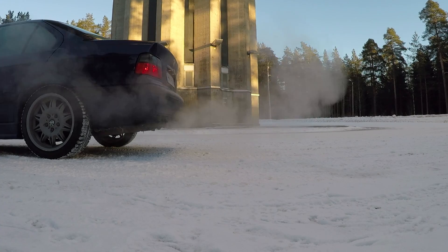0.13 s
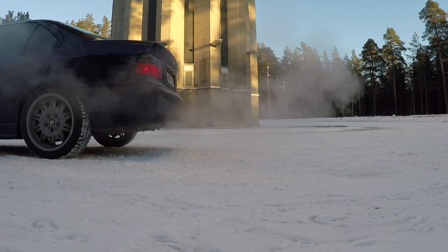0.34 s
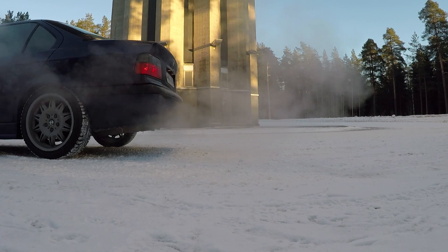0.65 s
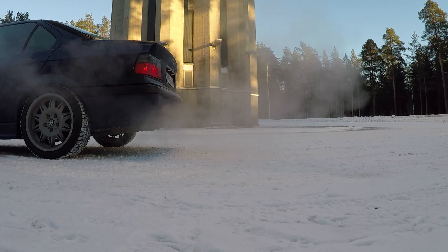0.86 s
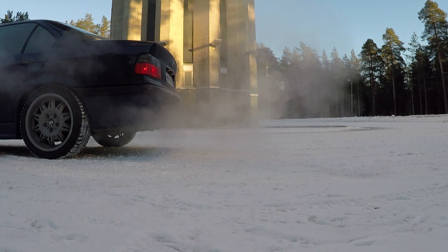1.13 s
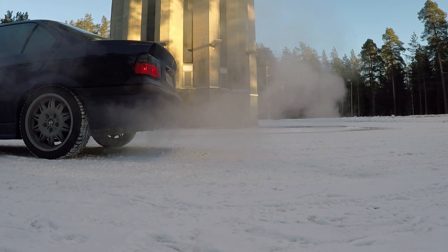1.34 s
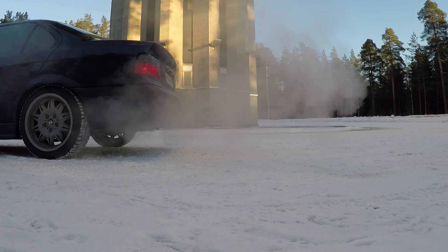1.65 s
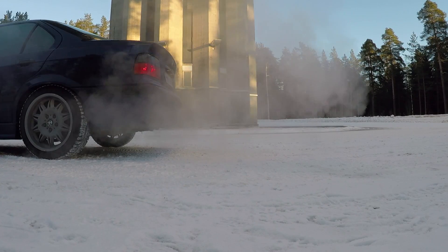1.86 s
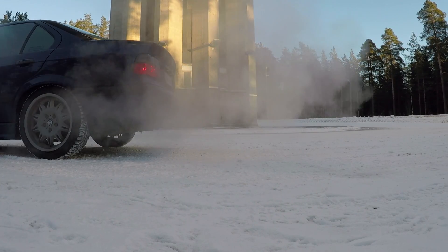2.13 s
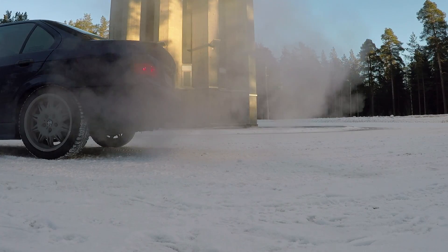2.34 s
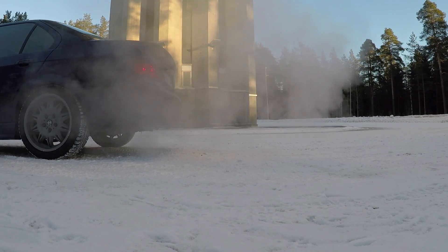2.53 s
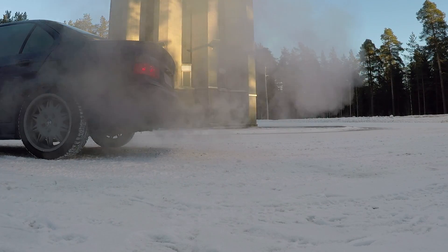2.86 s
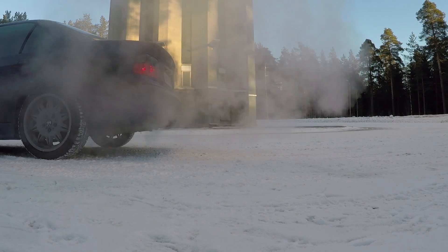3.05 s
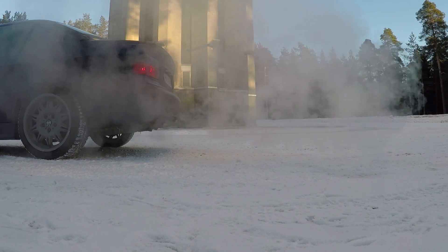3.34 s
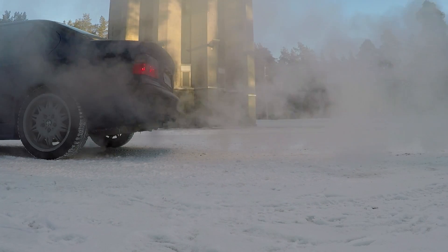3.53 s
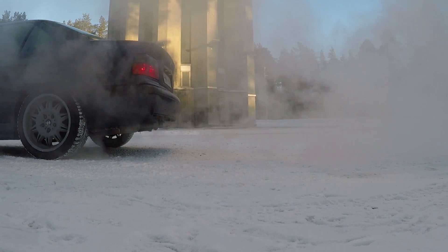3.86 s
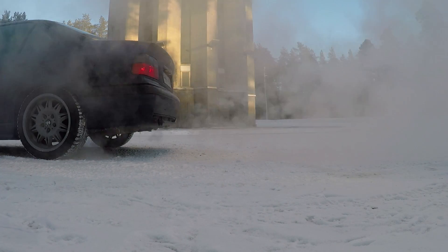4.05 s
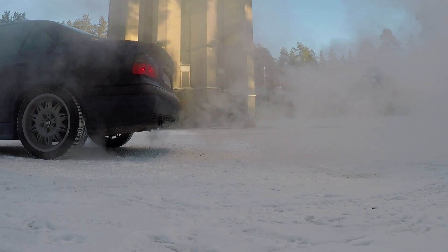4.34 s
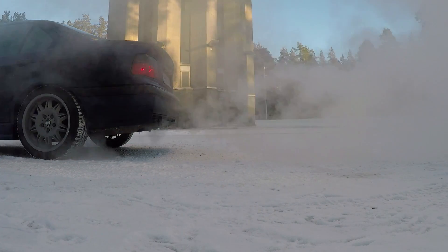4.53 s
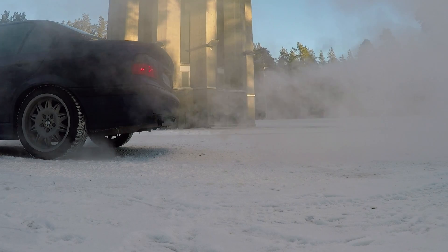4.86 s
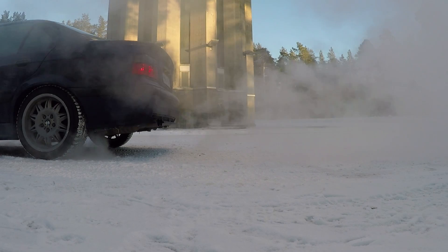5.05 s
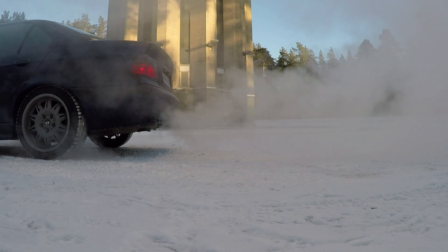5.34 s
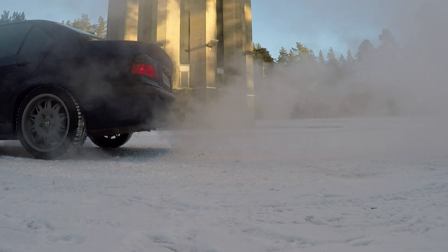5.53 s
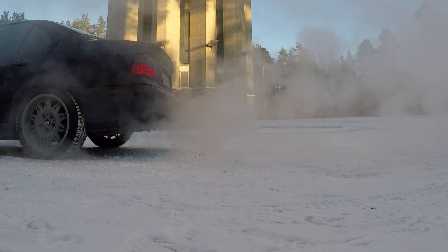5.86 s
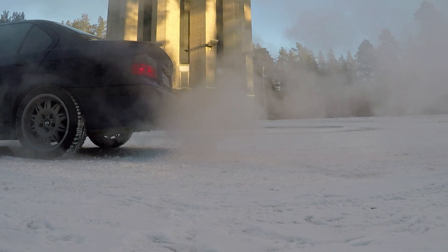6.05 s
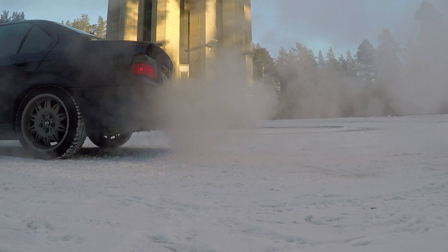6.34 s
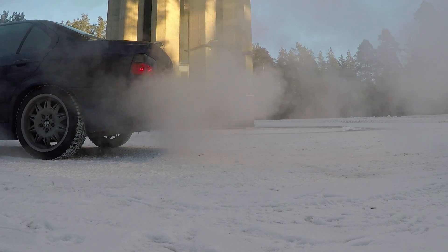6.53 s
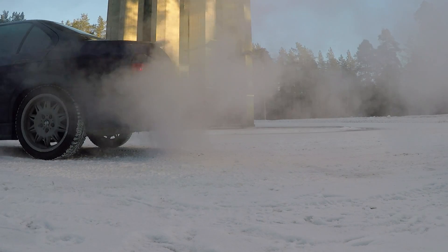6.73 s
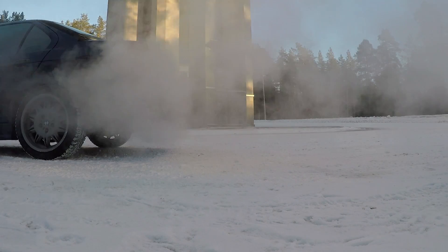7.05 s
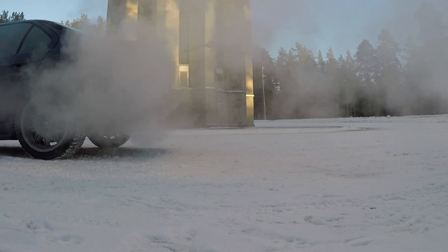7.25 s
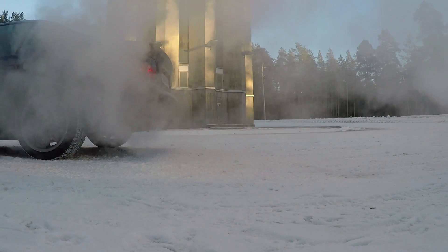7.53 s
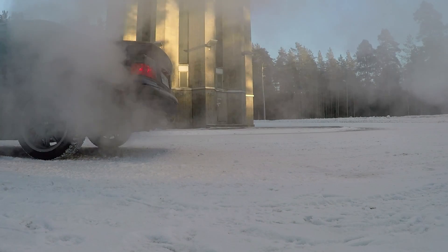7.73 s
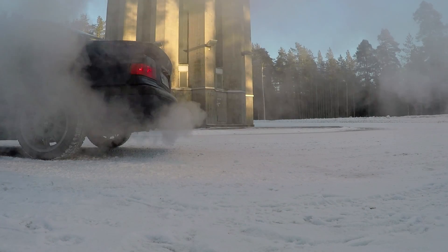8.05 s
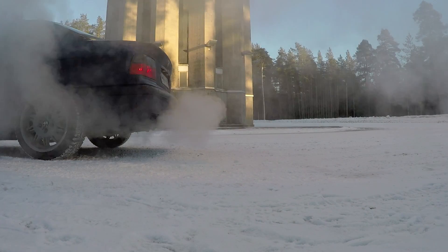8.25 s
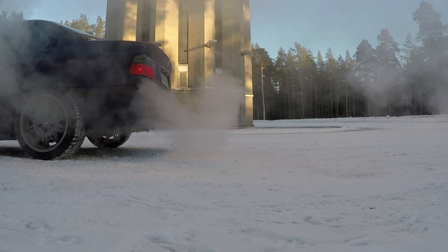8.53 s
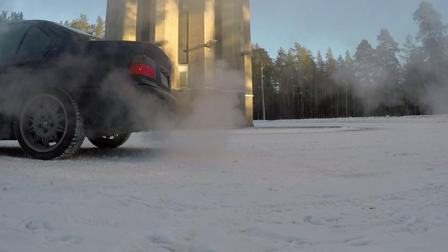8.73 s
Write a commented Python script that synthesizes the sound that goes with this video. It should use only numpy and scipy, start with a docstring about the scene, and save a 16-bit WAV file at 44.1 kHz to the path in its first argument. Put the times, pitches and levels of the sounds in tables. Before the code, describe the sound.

Raspy exhaust of a parked car: two short throttle stabs, a long climb to rapid-fire limiter banging, then a slow fall to uneven idle.

```python
"""A straight-six falls from a few thousand rpm, is blipped twice, then held and rasps up to its limiter.
The limiter cuts and restores the fuel about seven times a second; the revs then drone down to a lumpy idle.
Crank-order sines make the exhaust note; pulse-gated noise makes bark, rasp and pumped rush.
Damped sines make the low booms; filtered noise makes intake hiss, engine-bay whirr and one faint tick."""
import sys
import numpy as np
from scipy import signal
from scipy.fft import rfft, irfft
from scipy.io import wavfile
from scipy.ndimage import uniform_filter1d

SR = 44100
rng = np.random.default_rng(int(sys.argv[2]) if len(sys.argv) > 2 else 0)


def output_pcm(signal):
    """Save a mono or channel-first signal as 16-bit PCM at the path in sys.argv[1].

    Samples are clipped to [-1, 1] before scaling.
    """
    pcm = np.clip(np.atleast_2d(signal).T, -1, 1) * 32767
    wavfile.write(sys.argv[1], SR, np.round(pcm).astype(np.int16))


N = 392049
T = np.arange(N) / SR

# throttle presses, the last into the limiter:
# opens_s, ends_s, close_s, reached_rpm (before limiting), relative gas_db, relative crack_db
PRESSES = [(.96, 1.155, .035, 3343, -2, 10), (1.877, 2.131, 0.15, 3437, -2, 16),
           (2.83, 3.421, .02, 7276, 1.26, 8)]
# fuel returns at the limiter: start_s, relative thump_db
BURSTS = [(3.522, -18), (3.678, -15.5), (3.826, -19), (3.964, -19.5), (4.118, -21), (4.258, -17.5),
          (4.405, -17), (4.548, -20.5), (4.701, -16.5), (4.856, -20), (5.003, -22), (5.149, -19)]
BURST_S = .048
FIRST_CUT_S, LAST_CUT_S = PRESSES[-1][1], BURSTS[-1][0] + BURST_S
LIMIT_RPM, LIFT_S = 7037, 5.23  # the foot lifts off the limiter at LIFT_S
OPEN_S, GAS_LAG_S = .012, 0.0063  # throttle opening time; delay of the gas behind it


def undb(db):
    """Decibels to gain."""
    return 10 ** (np.asarray(db) / 20)


def unit(x):
    """Scale to rms 1."""
    return x / np.sqrt(np.mean(x ** 2))


def noise():
    """White noise."""
    return rng.standard_normal(N)


def walk(rate_hz):
    """Smooth random signal of rms 1 with rate_hz new values a second."""
    steps = np.interp(T * rate_hz, np.arange(4096), rng.standard_normal(4096))
    return unit(uniform_filter1d(steps, size=200))


def gate(start_s, end_s, rise_s, fall_s):
    """1 between two times, with linear edges centred on them."""
    rise = np.clip((T - start_s) / rise_s + .5, 0, 1)
    fall = np.clip((end_s - T) / fall_s + .5, 0, 1)
    return rise * fall


def along(x, points):
    """Read a table at x, joined by straight lines."""
    return np.interp(x, *np.transpose(points))


def law(rpm, db, slope_db):
    """Level of db at 3000 rpm, growing by slope_db per doubling of the revs."""
    return db + slope_db * np.log2(rpm / 3000)


def response(hz, points):
    """Spectrum level in dB at hz, interpolated over log frequency."""
    point_hz, db = np.transpose(points)
    return np.interp(np.log(hz + 1), np.log(point_hz), db)


def colour(x, points, rings=()):
    """Filter by a spectrum plus resonances (hz, width_hz, peak_db), then scale to rms 1."""
    hz = np.linspace(0, SR / 2, 2 ** 18 + 1)
    db = response(hz, points)
    for ring_hz, width_hz, peak_db in rings:
        db = db + peak_db / (1 + (2 * (hz - ring_hz) / width_hz) ** 2)
    size = 2 * (len(hz) - 1)
    return unit(irfft(rfft(x, size) * undb(db))[:N])


def pedal(opens_s, ends_s, close_s):
    """Throttle opening, 0-1, during one press."""
    opening = np.clip((T - opens_s) / OPEN_S, 0, 1)
    closing = np.clip((ends_s - T) / close_s, 0, 1)
    return opening * closing


def run_down(start_s, start_rpm, drag=1):
    """Revs falling under friction plus windage that grows with speed squared (tangent law)."""
    friction_rpm_per_s, windage_rpm = 1315, 6167  # at full drag; total drag doubles at windage_rpm
    fall = drag * friction_rpm_per_s / windage_rpm * np.maximum(T - start_s, 0)
    angle = np.arctan(start_rpm / windage_rpm) - fall
    return windage_rpm * np.tan(np.maximum(angle, 0))


def speed():
    """Crankshaft rpm: presses add speed, drag removes it, limiter and idle bound it."""
    # idle floor as it catches and settles: time_s, speed_rpm
    idle_floor = [(8.55, 1160), (8.89, 969)]
    start_rpm, blip_drag = 3565, .95  # share of full drag felt before the limiter
    rpm = run_down(0, start_rpm, blip_drag)
    for opens_s, ends_s, close_s, reached_rpm, _, _ in PRESSES:
        push = np.cumsum(pedal(opens_s, ends_s, close_s))
        gain_rpm = reached_rpm - np.interp(ends_s, T, rpm)
        rising = rpm + gain_rpm * push / push[-1]
        rpm = np.where(T < ends_s, rising, run_down(ends_s, reached_rpm, blip_drag))
    rpm = np.where(T < FIRST_CUT_S, rpm, run_down(LIFT_S, LIMIT_RPM))
    return np.clip(rpm, along(T, idle_floor), LIMIT_RPM)


def limiter(edge_s=0.011, swing=.019):
    """Fuel gate and speed factor at the limiter: speed climbs in each burst and drops in each cut."""
    fuel = sum(gate(s, s + BURST_S, edge_s, edge_s) for s, _ in BURSTS)
    points = [(FIRST_CUT_S, 0)]
    for start_s, _ in BURSTS:
        points += [(start_s, -swing), (start_s + BURST_S, swing)]
    points.append((LAST_CUT_S + 0.1203, 0))
    return fuel, 1 + along(T, points)


def subdued(return_s=0.51):
    """1 while the foot is down, then fading: the coasting sound starts quiet and swells back."""
    spans = [(0, 0.0092)] + [row[:2] for row in PRESSES] + [(FIRST_CUT_S, LIFT_S)]
    holds = [(T >= a) * np.exp(-(np.maximum(T - b, 0) / return_s) ** 2) for a, b in spans]
    return np.max(holds, axis=0)


def firings(cycles, scatter_db, jitter_s):
    """One pulse per firing; the six cylinders differ in level and delay, and so does each burn."""
    at = np.flatnonzero(np.diff(np.floor(6 * cycles)))
    chance = rng.standard_normal((4096, 2))[:len(at)]
    cylinder_db = np.resize([3, -2, 1, -3, 2.5, -1], len(at))
    runner_s = np.resize([0, .0005, .0001, .0009, .0007, .0002], len(at))
    delay_s = runner_s + jitter_s * chance[:, 1]
    where = np.clip(at + SR * delay_s, 0, N - 1).astype(int)
    pulses = np.zeros(N)
    pulses[where] = undb(cylinder_db + scatter_db * chance[:, 0])
    # similar power at every engine speed
    return unit(pulses / np.sqrt(np.gradient(cycles)))


def gas(pulses, puff_s, steady):
    """Turbulence that puffs after each firing, over a steady flow."""
    puffs = unit(signal.lfilter([1], [1, -np.exp(-1 / (puff_s * SR))], pulses))
    return unit(noise() * (steady + puffs))


def crackle(rate_hz=1200, spread_db=3.2):
    """Small shock fronts leave the pipe at random moments."""
    size = undb(spread_db * np.minimum(rng.exponential(size=N), 4))
    return unit((rng.random(N) < rate_hz / SR) * size)


def tick(at_s=7.0, level_db=-42, decay_s=0.01):
    """One faint metallic tick as the revs fall: decaying filtered noise."""
    fade = (T > at_s) * np.exp(-np.abs(T - at_s) / decay_s)
    return undb(level_db) * fade * colour(noise(), [(2500, -23), (4200, 1), (6500, -6), (9000, -28)])


def whirr(rpm, sink_db=-5.0):
    """Fan, belts and valve gear whirr in front: filtered noise levelled by the revs."""
    # spectrum: freq_hz, relative level_db
    whirr_colour = [(20, -3.5), (60, 13.5), (190, 3.5), (290, -2), (450, 1.5), (700, 3.5), (900, -1.5),
                    (1150, 1), (1500, -9), (2500, -15.5), (5000, -45.5)]
    # speed_rpm, relative level_db
    whirr_level = [(1150, -45.5), (2200, -39), (5500, -36.5)]
    level_db = along(rpm, whirr_level) + sink_db * subdued()
    return undb(level_db + 7.5 + 1.0 * walk(13)) * colour(noise(), whirr_colour)


def pumped_rush(rpm, cycles, sink_db=-5, driven_db=-4):
    """Pumped air rushes from the pipe; its even strokes buzz in high harmonics of the firing rate."""
    # spectrum: freq_hz, relative level_db
    rush_colour = [(700, -20.5), (1300, -4), (2000, -4.5), (2500, -1), (3600, -6.5), (4800, -6.5),
                   (5900, -11.5), (7500, -12), (9200, -18.5), (12500, -21.5), (15500, -30)]
    # throttle shut: speed_rpm, relative level_db
    rush_level = [(1100, -63.5), (1900, -53), (3400, -48), (4800, -38.5), (7000, -30)]
    # the rush gives way to the rasp during the long press and the limiter
    driven = gate(PRESSES[-1][0], LIFT_S, 0.056, 0.056)
    level_db = along(rpm, rush_level) + sink_db * subdued() + driven_db * driven
    strokes = firings(cycles, scatter_db=1, jitter_s=0.00022)
    flow = colour(gas(strokes, puff_s=0.0074, steady=3.2), rush_colour)
    rush = undb(level_db + 0.94 + .5 * walk(16)) * flow
    comb = 0
    for order in range(18, 78, 6):
        phase = rng.uniform(0, 2 * np.pi) + .2 * walk(30)
        comb = comb + np.sin(2 * np.pi * order * cycles + phase)
    buzz = undb(level_db - 4.3) * colour(comb, [(600, -12), (1000, 0), (1800, -6), (3500, -6)])
    return rush + buzz


def intake(rpm, throttle):
    """Air hisses past the open throttle plate at a level that follows the revs."""
    level_db = along(rpm, [(2400, -48.5), (3700, -37.5), (6000, -38.5)])
    hiss_colour = [(1500, -17), (4500, 1.5), (6300, -4), (7500, 2.5), (9500, -7.0), (13000, -8), (15500, -34)]
    return undb(level_db) * throttle * colour(noise(), hiss_colour)


def thump(start_s, level_db, boom_hz=66, boom_s=0.011, knock_hz=185, knock_s=0.0062, knock=0.47):
    """A low boom: two damped sines, each swelling and then dying away."""
    t = np.arange(SR // 6) / SR

    def ring(hz, life_s):
        """Sine whose envelope peaks after life_s."""
        return t / life_s * np.exp(1 - t / life_s) * np.sin(2 * np.pi * hz * t)

    hit = ring(boom_hz, boom_s) + knock * ring(knock_hz, knock_s)
    lead = np.zeros(max(int(start_s * SR), 0))
    return undb(level_db) * np.concatenate([lead, hit, np.zeros(N)])[:N]


def thumps():
    """Low booms at the very start, around throttle changes, as the idle catches and at both burst edges."""
    # low booms outside the bursts: time_s, relative level_db
    booms = [(.001, -12), (0.052, -9), (.964, -8.5), (1.144, -12), (1.211, -10.5), (1.887, -12.5),
             (2.129, -8), (2.159, -10), (2.835, -18), (3.411, -8), (5.288, -5.5), (8.648, -17)]
    out = undb(2.5) * sum(thump(s - .004, db) for s, db in booms)
    for s, db in BURSTS:
        out += thump(s - .006, db + 11.5, boom_hz=84.48, boom_s=0.0037, knock=0.27)
        out += thump(s + BURST_S - .009, db + 11, boom_hz=75.5, boom_s=0.0073, knock=0.45)
    return out


def load_gains(rpm, burst_db=-21.5, before_db=-29, after_db=-37, fade_db=3):
    """Bark gain, rasp gain and limiter gate: gas cracks at opening, grows with revs, flares in bursts."""
    bark_law, rasp_law = (-29, 6.8), (-38, 9)  # relative dB at 3000 rpm, dB per doubling
    crack_s = .028
    bark = rasp = 0
    for opens_s, ends_s, close_s, _, gas_db, crack_db in PRESSES:
        flow = pedal(opens_s + GAS_LAG_S, ends_s, close_s)
        crack = crack_db * np.exp(-np.abs(T - opens_s - GAS_LAG_S - OPEN_S) / crack_s)
        bark = bark + flow * undb(law(rpm, *bark_law) + gas_db + .5 * crack)
        rasp = rasp + flow * undb(law(rpm, *rasp_law) + gas_db + crack)
    # after each burst the rasp sinks, then builds toward the next
    flare = [(-.003, before_db), (0.0053, burst_db),
             (BURST_S - .012, burst_db - fade_db), (BURST_S + 0.0058, after_db)]
    points = [(FIRST_CUT_S, after_db)] + [(s + lag, db) for s, _ in BURSTS for lag, db in flare]
    flare_db = along(T, points)
    held = gate(FIRST_CUT_S - .012, LAST_CUT_S + 0.021, .025, 0.013)
    bark = bark + held * undb(0.71 * flare_db - 3.0)
    rasp = rasp + held * undb(flare_db + 1.5)
    return bark, rasp, held


def under_load(rpm, cycles, fuel):
    """Hot gas barks in pulses and rasps in ragged fronts; crackle grows in limiter bursts."""
    # spectra: freq_hz, relative level_db
    bark_colour = [(150, -12), (330, -4), (450, -3.5), (600, -2), (740, 2), (840, -6.5), (950, -14),
                   (1300, -25.5), (2500, -38), (9000, -44)]
    rasp_colour = [(600, -12), (1000, -23), (1200, -4), (1580, -1), (1900, -5.5), (2400, -5.5), (3100, -8),
                   (4100, -6.5), (5000, -13.5), (7500, -18), (9100, -26.5), (12200, -24.5), (15500, -44)]
    # tailpipe resonances: freq_hz, width_hz, peak_db
    tail_rings = [(596, 14, 8), (734, 44, -5), (1378, 67, 5.5), (1583, 119.6, 6.5), (2330, 340, 6),
                  (3109, 180, 8.5), (3373, 110, 4), (7700, 1000, 3)]
    bark, rasp, held = load_gains(rpm)
    # pressure pulses keep time; their sharp fronts scatter more
    pulses = firings(cycles, scatter_db=1.8, jitter_s=.00007)
    fronts = firings(cycles, scatter_db=2.5, jitter_s=.0005)
    puffs = gas(fronts, puff_s=.003, steady=.6)
    low = colour((1 - .5 * held) * pulses + (.55 + .3 * held) * puffs, bark_colour, tail_rings)
    shocks = (.2 + .3 * fuel) * fronts + (.1 + .55 * fuel) * crackle()
    high = colour(gas(fronts, puff_s=0.0068, steady=1.9) + shocks, rasp_colour, tail_rings)
    return undb(3.0) * bark * low + undb(1.5) * rasp * high


def note_levels(rpm, throttle, lift_db=-8, lift_s=0.085, idle_dip_db=-11, sink_db=-4.5, lump_db=5, lump_s=0.127):
    """Relative dB of firing tone, bank tone, overtones and unevenness from revs and throttle."""
    # all: speed_rpm, relative level_db
    # firing tone, swelling and fading as the revs cross pipe resonances, throttle shut and open
    firing_shut = [(1100, -16), (1500, -9.5), (2350, -13.5), (2750, -19.5), (3200, -14.5), (3750, -8.5),
                   (4450, -10.5), (5100, -10), (5750, -25.5), (6550, -16.5), (7000, -19.5)]
    firing_open = [(2700, -9), (3800, -10.5), (5050, -19.5), (5650, -11), (6350, -23), (7000, -15)]
    # tone of one three-cylinder bank
    bank_level = [(1300, -55), (1750, -31), (2150, -25), (2520, -16), (2900, -21.5), (4400, -32.5),
                  (5900, -18.5), (7000, -20.5)]
    # overtones of the firing rate
    overtone_level = [(1150, -30), (1550, -19), (2700, -16), (3700, -22.5), (4300, -20.5), (4800, -9),
                      (5700, -18.5), (6700, -12)]
    # beat of unequal cylinders
    uneven_level = [(1500, -38), (2300, -28.5), (3050, -25), (3900, -29), (4550, -13), (7000, -15)]
    idle_dip_s, idle_lumpy_s = 8.41, 8.59
    load = np.clip(8 * throttle, 0, 1)
    shut = 1 - load
    limiting = gate(FIRST_CUT_S, LIFT_S + .08, 0.024, 0.058)
    lumpy = gate(idle_lumpy_s, np.inf, 0.032, 1)
    quiet_db = sink_db * subdued() * shut
    # the level dips as each press ends and as the idle catches, then comes in lumps
    dip_db = lift_db * sum(gate(ends_s, ends_s + lift_s, 0.031, .04) for _, ends_s, *_ in PRESSES)
    dip_db = dip_db + idle_dip_db * gate(idle_dip_s, idle_lumpy_s, 0.034, .05)
    lump_wave = 2 * np.abs(np.sin(np.pi * (T - idle_lumpy_s) / lump_s)) - 1
    lumps_db = lumpy * lump_db * lump_wave
    firing_db = shut * along(rpm, firing_shut) + load * along(rpm, firing_open) + dip_db + lumps_db
    bank_db = along(rpm, bank_level) - 6 * load * (rpm < 3300) + 10.1 * limiting + 15 * lumpy
    overtone_db = shut * along(rpm, overtone_level) - 14.3 * load + 1.7 * limiting + 0.21 * dip_db + 5 * lumpy
    uneven_db = shut * along(rpm, uneven_level) - 24 * load + 1.24 * limiting + 14 * lumpy
    return [db + quiet_db for db in (firing_db, bank_db, overtone_db, uneven_db)]


def exhaust_note(rpm, cycle_hz, cycles, throttle, fuel, hunting_rough=3.2):
    """Harmonics of the two-turn cycle: every sixth is the firing rate, every third belongs to one bank."""
    # exhaust response, booming near 68 and 195 Hz: freq_hz, level_db
    pipe = [(30, -24), (50, -15.5), (68, 2), (100, -9.5), (130, -3.5), (160, -6), (195, 0.5), (235, -6.5),
            (270, -16), (330, -13.5), (400, -19.5), (490, -18), (700, -19.5), (1000, -27.5), (2000, -35.5)]
    # 2nd to 8th harmonic of the firing rate: relative level_db
    harmonic_db = [2, -5.5, -10, -14, -13, -16.5, -18]
    firing_db, bank_db, overtone_db, uneven_db = note_levels(rpm, throttle)
    angle = 2 * np.pi * cycles
    # near the limiter cycles vary more; the note also chokes just after each burst
    rough = 1 + hunting_rough * gate(3.12, LAST_CUT_S, 0.069, 0.046)
    choke_db = -9 * sum(gate(s + BURST_S + 0.0012, s + BURST_S + 0.032, 0.016, 0.021) for s, _ in BURSTS)

    def tone(order, db, flutter):
        """One harmonic, fluttering in size and timing."""
        depth = flutter * rough
        size = np.sqrt(2) * undb(db) * (1 + depth * walk(36))
        phase = rng.uniform(0, 2 * np.pi) + depth * walk(36)
        return size * np.sin(order * angle + phase)

    def piped(order, db, flutter):
        """One harmonic through the exhaust response."""
        return tone(order, db + response(order * cycle_hz, pipe), flutter)

    out = tone(order=6, db=firing_db + 2 * choke_db, flutter=.05)
    # the bank tone drones while the fuel is cut and collapses when it returns
    bank_db = bank_db - 13 * fuel + .5 * choke_db
    out += tone(order=3, db=bank_db, flutter=0.021)
    out += piped(order=9, db=bank_db - 1, flutter=.12)
    out += piped(order=15, db=bank_db - 8, flutter=.2)
    for order, db in zip(range(12, 54, 6), harmonic_db):
        out += piped(order, overtone_db + db + choke_db, flutter=0.2)
    for order in (1, 2, 4, 5, 7, 8, 10, 11, 13, 14, 16, 17, 19, 20):
        out += piped(order, uneven_db - 4.0 + choke_db, flutter=0.31)
    return out


def scene():
    """All engine layers run from the same throttle and crankshaft; booms and tick have their own times."""
    throttle = sum(pedal(*row[:3]) for row in PRESSES)
    fuel, hunt = limiter()
    rpm = speed()
    cycle_hz = hunt * rpm / 120  # one cycle is two turns
    cycles = np.cumsum(cycle_hz) / SR
    late_throttle = np.interp(T - GAS_LAG_S, T, throttle)
    background = tick() + whirr(rpm) + pumped_rush(rpm, cycles) + intake(rpm, late_throttle)
    exhaust = thumps() + under_load(rpm, cycles, fuel) + exhaust_note(rpm, cycle_hz, cycles, throttle, fuel)
    return (background + exhaust)[None]


def record(dry, top_hz=15300):
    """Round the highest peaks softly, then cut steeply above top_hz."""
    rounded = dry / (1 + dry ** 6) ** (1 / 6)
    low_pass = signal.ellip(12, .2, 80, top_hz, fs=SR, output="sos")
    return signal.sosfilt(low_pass, rounded)


dry = scene()
out = record(dry)
output_pcm(out)
```